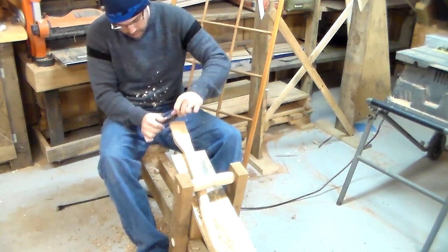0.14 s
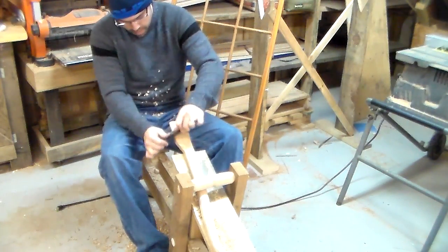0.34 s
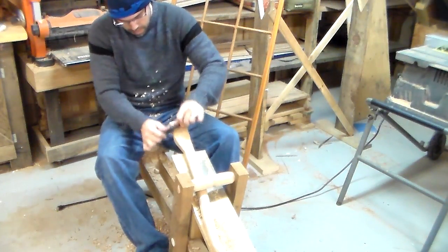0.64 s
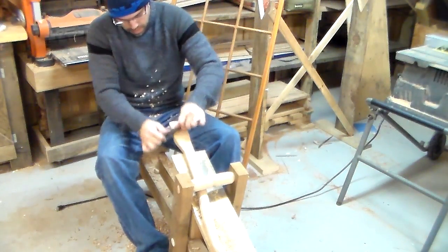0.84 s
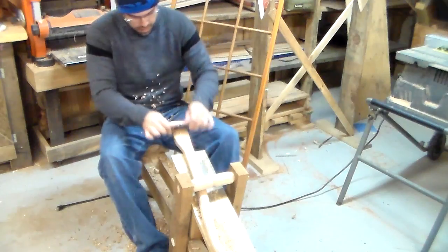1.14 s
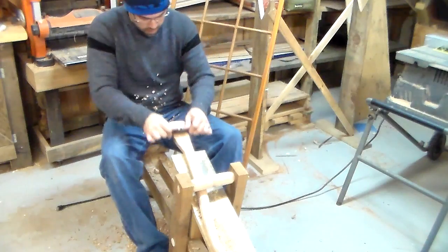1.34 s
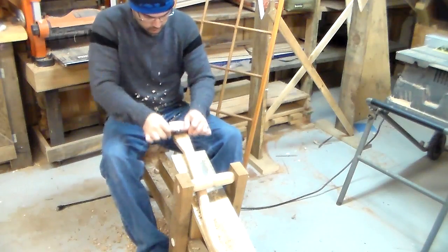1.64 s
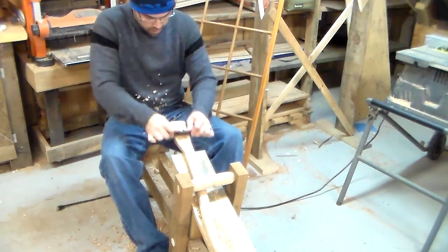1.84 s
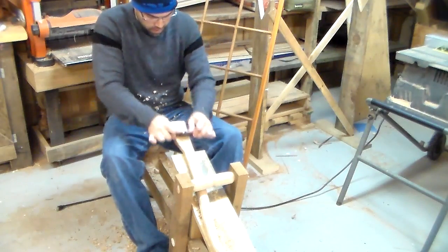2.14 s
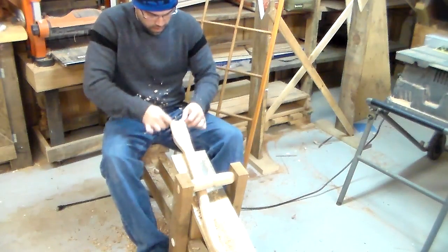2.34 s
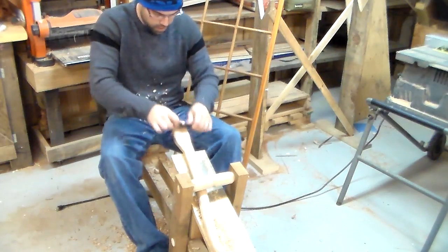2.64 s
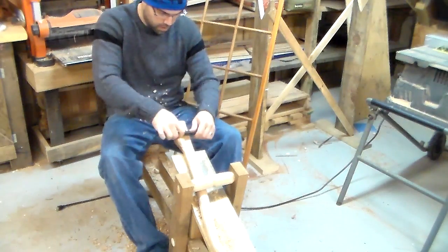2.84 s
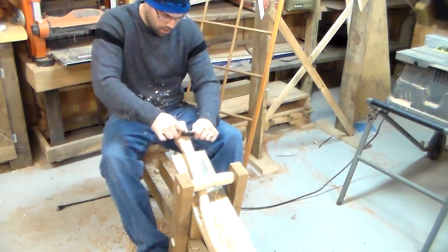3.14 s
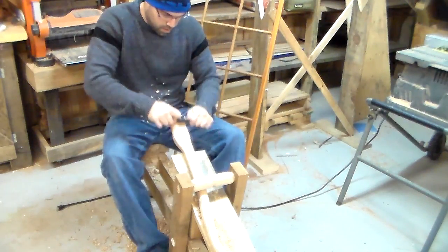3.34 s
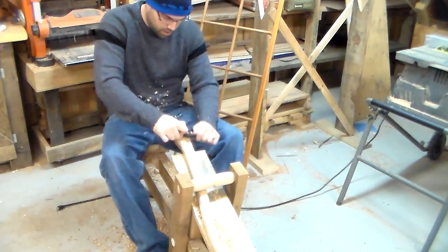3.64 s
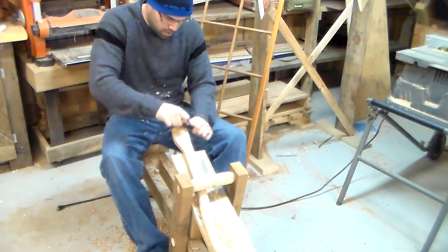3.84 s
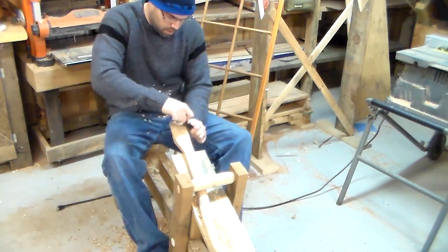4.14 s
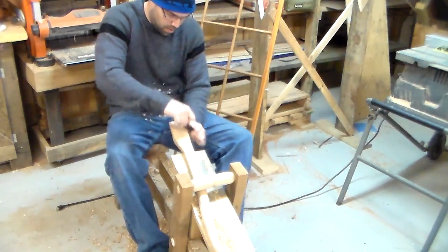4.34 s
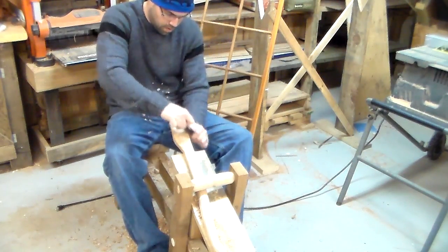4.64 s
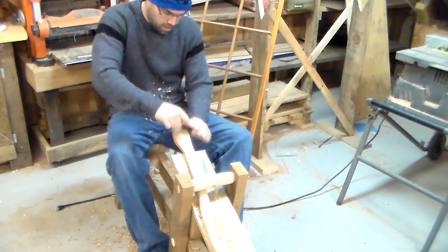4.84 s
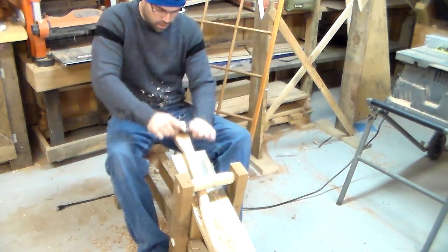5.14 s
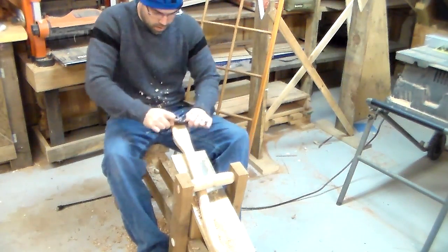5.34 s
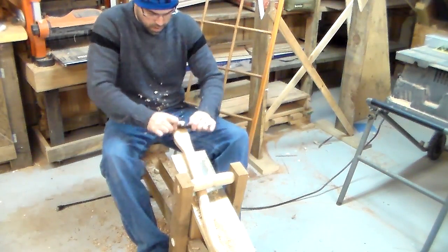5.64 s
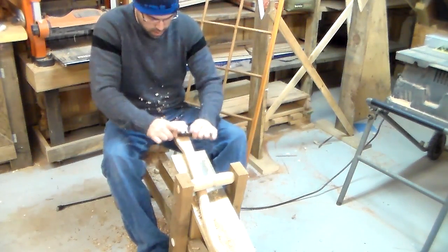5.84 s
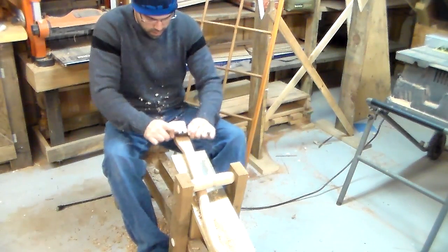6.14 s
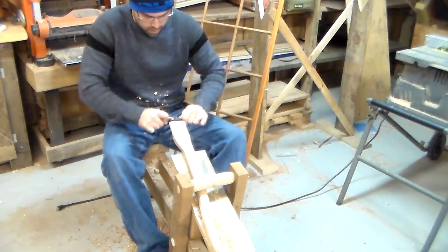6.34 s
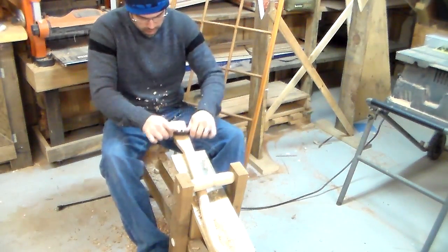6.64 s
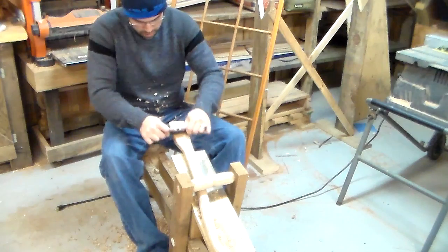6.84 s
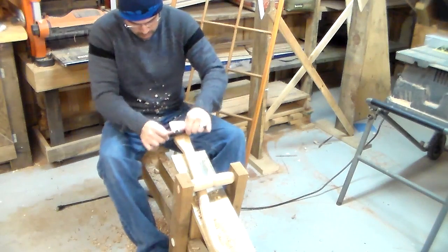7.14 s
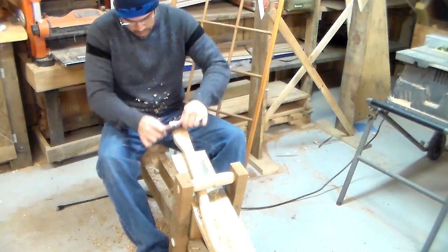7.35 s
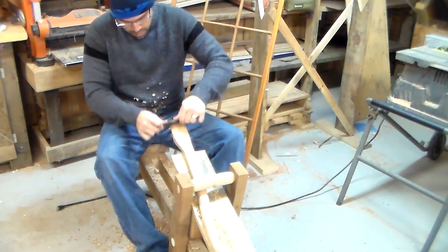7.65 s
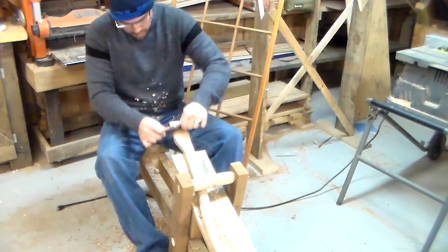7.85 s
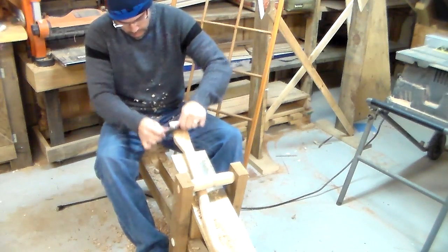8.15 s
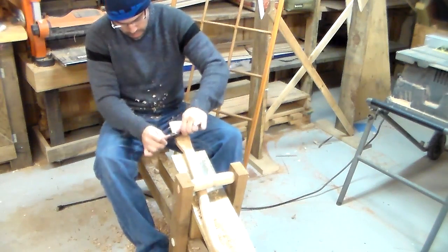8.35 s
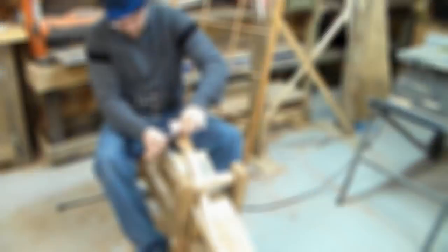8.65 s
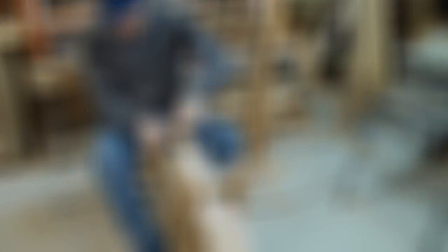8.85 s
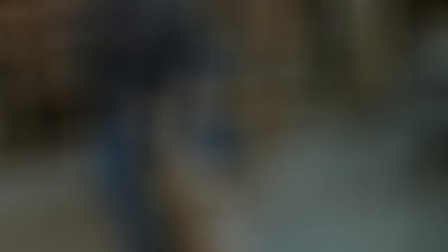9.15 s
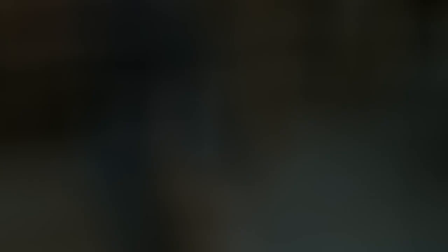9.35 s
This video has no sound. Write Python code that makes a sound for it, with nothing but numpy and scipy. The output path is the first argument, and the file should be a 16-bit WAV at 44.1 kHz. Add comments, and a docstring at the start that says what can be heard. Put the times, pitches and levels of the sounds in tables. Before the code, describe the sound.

Uneven scraping of a hand blade on wood, broken by sharp clacks and dull thuds, in a quiet small workshop.

```python
"""Spokeshave on end grain

A steel spokeshave pares the end of a wooden blank clamped in a shaving horse, in a timber workshop.
Tearing fibres, as random impulses, drive resonant modes of blank, horse and tool and sound as a rasp.
Among the strokes the tool lands (noisy impacts on the modes), skids, squeaks (stick-slip tones) and
slides back. Decaying noise adds a short room tail; a low hum, rumble and hiss lie beneath."""
import sys
import numpy as np
from scipy import signal
from scipy.fft import rfft, irfft, next_fast_len
from scipy.io import wavfile

SR = 44100
rng = np.random.default_rng(int(sys.argv[2]) if len(sys.argv) > 2 else 0)


def unload_audio(sound):
    """Save the sound as a 16-bit wav file, at the path given as the first command line argument."""
    columns = np.transpose(np.atleast_2d(sound))
    # keep every value between -1 and 1, then stretch to whole-number steps
    steps = np.round(np.clip(columns, -1, 1) * 32767)
    wavfile.write(sys.argv[1], SR, steps.astype(np.int16))


N = 419391


def from_db(db):
    """Logarithmic level: decibels to amplitude gain."""
    return 10 ** (np.asarray(db) / 20)


def rms_one(x):
    """Normalisation: a signal scaled to unit mean power."""
    return x / np.sqrt(np.mean(x ** 2) + 1e-20)


def at_hz(points, hz):
    """Interpolation of a frequency table on a logarithmic axis."""
    f, values = np.transpose(points)
    return np.interp(np.log(hz + 1), np.log(f), values)


def over_time(points):
    """Linear interpolation of a time table at every sample."""
    return np.interp(np.arange(N) / SR, *np.transpose(points))


def colour(x, spectrum):
    """Spectral shaping: each frequency is weighted by a smooth gain curve."""
    size = next_fast_len(x.shape[-1])
    gain = from_db(at_hz(spectrum, np.fft.rfftfreq(size, 1 / SR)))
    return irfft(rfft(x, size) * gain, size)[..., :x.shape[-1]]


def bandpass(x, band):
    """Band limitation by a Butterworth filter."""
    return signal.sosfilt(signal.butter(2, band, "band", fs=SR, output="sos"), x)


def drift(rate_hz):
    """Low-passed random fluctuation of unit spread, drawn at every 32nd sample."""
    r = np.exp(-64 * np.pi * rate_hz / SR)
    settle = 1400   # steps dropped while the filter settles
    noise = rng.standard_normal(N // 32 + settle + 2)
    slow = signal.lfilter([1], [1, -2 * r, r * r], noise)[settle:]
    return np.interp(np.arange(N) / 32, np.arange(len(slow)), rms_one(slow))


# rumble and hiss: f/Hz, level/dB per Hz (relative)
AIR_SPECTRUM = [(20, 3), (41, 7), (61, 14), (110, -4), (240, 0), (1000, -6.5), (4000, -15), (14500, -21)]


def air():
    """Stationary noise: independent coloured rumble and hiss for mid and side."""
    level_db, side_db = -59, -3.0
    mid, side = from_db(level_db) * rms_one(colour(rng.standard_normal((2, N)), AIR_SPECTRUM))
    return mid, from_db(side_db) * side


def hum():
    """Amplitude modulation: a pure low tone of slightly wandering level."""
    hz, level_db = 30.0, -59
    level = np.sqrt(2) * from_db(level_db + 1.2 * drift(3.4))
    return level * np.sin(2 * np.pi * hz * np.arange(N) / SR)


# reverberation time of the room: f/Hz, t60/s
ROOM_DECAY = [(100, 0.08), (700, 0.31), (2000, 0.33), (5000, 0.19), (12000, 0.15)]


def workshop(x):
    """Reverberation: convolution with noise tails that decay exponentially, band by band."""
    t = np.arange(int(0.5 * SR)) / SR
    edges = 60 * 2.0 ** np.arange(9)   # octaves
    tails = 0
    for low, high in zip(edges, edges[1:]):
        band = bandpass(rng.standard_normal((3, len(t))), [low, high])
        tails = tails + band * from_db(-60 * t / at_hz(ROOM_DECAY, np.sqrt(low * high)))
    tails = tails * (1 - np.exp(-t / 0.00011))   # first echoes need a moment to arrive
    tails = tails / np.sqrt(np.sum(tails ** 2, axis=1, keepdims=True))
    # two tails are shared by both channels and traded as the hands move; the third, drawn on its own, is the
    # difference between the channels
    place = 2 * drift(2.08)
    sources = [x * np.cos(place), x * np.sin(place), x]
    here, there, differing = signal.fftconvolve(sources, tails, axes=1)[:, :N]
    return here + there, differing


# the sole squeaks on the end grain: t/s, length/s, starting f/Hz, level/dB (relative)
SQUEAK_EVENTS = [(1.529, 0.066, 1700, -25.5), (1.62, 0.0464, 1600, -26), (2.166, 0.069, 1470, -30)]


def squeaks():
    """Stick-slip friction: a rough tone and its octave swell, sag in pitch and fade."""
    sag_share, width_hz, octave_db = 0.18, 200, -13.5   # share of pitch lost; roughness; octave over tone
    t = np.arange(N) / SR
    rough = [drift(width_hz) for _ in range(4)]
    out = 0
    for start, length, hz, db in SQUEAK_EVENTS:
        since = t - start
        swell = np.sin(np.pi * np.clip(since / length, 0, 1) ** 2) ** 2   # builds slowly, breaks off fast
        phase = 2 * np.pi * (hz * since - sag_share * hz / length * since ** 2 / 2)
        tone = rough[0] * np.sin(phase) + rough[1] * np.cos(phase)
        octave = rough[2] * np.sin(2 * phase) + rough[3] * np.cos(2 * phase)
        out = out + from_db(db) * swell * (tone + from_db(octave_db) * octave)
    return out


def resonate(force, hz, width):
    """Damped resonance: one mode of unit peak gain strays in pitch as grip and clamping change."""
    stray_share, stray_hz = 0.008, 2.5
    r = np.exp(-np.pi * width / SR)
    path = hz * (1 + stray_share * drift(stray_hz))
    turn = np.exp(2j * np.pi * np.cumsum(path) / SR)
    # shift the mode to zero frequency, low-pass it there and shift it back
    slow = signal.lfilter([1 - r], [1, -r], (force + 1e-18) * turn.conj())
    return 2 * np.real(turn * slow)


def body(force, modes, shift_db):
    """Modal superposition: the moving contact point drives each parallel mode unevenly."""
    out = 0
    for k, (hz, width, db) in enumerate(modes):
        uneven = force * from_db(shift_db * drift(12.1))
        out = out + (-1) ** k * from_db(db) * resonate(uneven, hz, width)
    return out


# the tool lands or taps, then skids: t/s, clack level/dB (relative), thud level/dB over the clack,
# steel ring level/dB over the clack, skid level/dB (relative)
KNOCK_EVENTS = [(0.305, -18.5, 4, -28, -33.5), (0.394, -25.5, 11, -35, -32), (1.312, -17, 4.5, -32, -33),
                (1.347, -21, 6, 11.5, -34), (2.441, -10.5, 0.5, -18, -53), (2.476, -6.5, -9.5, -44, -28),
                (2.839, -46.5, 14, -36, -60.5), (3.076, -29, -9, -23, -56), (3.148, -25.5, -15, -14, -72),
                (3.619, -10, -7.5, -20, -24.5), (3.786, -2, -8.5, -30, -30.5),
                (4.706, -11.5, -4.5, -34, -26.5), (5.249, -17, -32, -20, -56),
                (6.412, -32, 10.5, -43, -29.5), (6.528, -13.5, 2.5, -43, -25), (6.772, -12, 6, -31, -27),
                (7.856, -19, 1.5, -20, -32), (7.882, -10.5, -12, -24, -37), (7.955, -14, -24, -8.5, -26.5),
                (8.248, -14.5, 5, -17, -50), (9.139, -29.5, -25, 11.5, -45), (9.183, -41, 14.5, -30, -50),
                (9.282, -18.5, -34, -2, -52), (9.32, -37.5, 18.5, -27, -58)]


def blows(over_clack_db, modes, contact_s, rattle_s, first_db):
    """Impact excitation: a first contact and its decaying noisy rattle strike a set of modes."""
    start, clack_db, *_ = np.transpose(KNOCK_EVENTS)
    clicks = np.zeros(N)
    clicks[(start * SR).astype(int)] = from_db(clack_db + over_clack_db)
    envelope = signal.lfilter([1], [1, -np.exp(-1 / (rattle_s * SR))], clicks + 1e-18)
    strike = from_db(first_db) * clicks + envelope * rng.standard_normal(N)
    soft = np.exp(-1 / (contact_s * SR))   # a longer contact is duller
    force = signal.lfilter([(1 - soft) ** 2], [1, -2 * soft, soft ** 2], strike)
    return body(force, modes, shift_db=2.5)


# modes of blank and horse: f/Hz, width/Hz (before any damping by the tool), level/dB (relative)
WOOD_MODES = [(116, 22, -20), (219, 28, -8), (285, 45, -13), (392, 20, 2), (500, 55, -9), (626, 24, 4),
              (744, 36, -4), (850, 110, -9)]
# modes of the blank's clamped end and the tool's sole: f/Hz, width/Hz, level/dB (relative)
SOLE_MODES = [(1054, 40, 0), (1256, 40, 2), (1420, 280, 3.5), (1787, 50, 3), (2015, 36, 3), (2560, 140, 0),
              (2905, 50, 2), (3200, 80, -2), (3490, 110, 1), (4050, 400, -5.5)]
# modes of steel blade and cap: f/Hz, width/Hz, level/dB (relative)
BLADE_MODES = [(5120, 60, 0), (6110, 50, -3), (6470, 70, -9), (7240, 200, -7)]


def knocks():
    """Impact response: a thud in the wood, a clack in the sole, a ring in the steel and its loose cap."""
    _, _, thud_db, ring_db, _ = np.transpose(KNOCK_EVENTS)
    pressed_widens = 2.5   # the landing tool damps the wood's modes
    wood = [(hz, pressed_widens * width, db) for hz, width, db in WOOD_MODES[1:]] + [(1160, 930, -4.5)]
    steel = SOLE_MODES[-2:] + BLADE_MODES[1:] + [(5490, 140, 4), (10200, 140, 1), (11000, 13500, -18)]
    thud = blows(thud_db, wood, contact_s=0.00015, rattle_s=0.011, first_db=22.0)
    clack = blows(0, SOLE_MODES, contact_s=0.00004, rattle_s=0.0035, first_db=15.5)
    ring = blows(ring_db, steel, contact_s=0.000012, rattle_s=0.0097, first_db=14)
    return from_db(8) * thud + from_db(-0.5) * clack + from_db(-2.0) * ring


# the blade bites: full bite t/s, rise/s, hold/s, cut level/dB (relative), then level/dB over the cut for
# low wood, upper wood, upper sole, edge sizzle
STROKE_EVENTS = [(0.037, 0.39, 0.036, -25, -6.5, -3.5, -10.5, -51),
                 (0.522, 0.012, 0.052, -24, -15.5, -11, -3.5, -8),
                 (0.768, 0.017, 0.047, -22, -21.5, -10, -5, -15),
                 (1.051, 0.047, 0.0056, -24.5, -5, -6.5, -5, -36),
                 (1.55, 0.13, 0.0046, -33.5, -16.5, -30, -2, -12),
                 (1.686, 0.063, 0.013, -27, -18.5, -9, -6.5, -14),
                 (1.779, 0.021, 0.021, -37, -6.5, -22, 12.5, 4),
                 (1.858, 0.04, 0.0056, -25, -35, -10.5, -21, -28),
                 (1.974, 0.084, 0.017, -27.5, -21, -17, -6, -28),
                 (2.104, 0.008, 0.017, -31.5, -6.5, -7, 2, -12),
                 (2.186, 0.0088, 0.065, -35, -13.5, -5, 0.5, -6.5),
                 (2.348, 0.051, 0.063, -26.5, -9, -17, -3, -16), (3.074, 0.28, 0.16, -58.5, -9, -24, 1, 3),
                 (3.401, 0.049, 0.064, -33, -2.5, -4, 8.5, -12.5),
                 (3.949, 0.079, 0.025, -28.5, -7.5, -4.5, -1, -14.5),
                 (4.255, 0.057, 0.0039, -28.5, -8, -5, 4, -7),
                 (4.464, 0.0076, 0.053, -23.5, -17, -10.5, -0.5, -11),
                 (4.856, 0.025, 0.0058, -33, -19.5, -16, 1.5, -10),
                 (5.171, 0.15, 0.005, -50, -5, -17, 13, 2), (5.29, 0.053, 0.034, -35.5, -11, -9, -1, -14),
                 (5.396, 0.015, 0.091, -35.5, -3.5, -0.5, 3.5, -15),
                 (5.597, 0.11, 0.005, -31, -12, -13.5, -4, -20.5),
                 (5.688, 0.014, 0.098, -26.5, -4.5, -1.5, 1, -20),
                 (6.033, 0.015, 0.052, -27.5, -10.5, -0.5, 3.5, -5),
                 (6.381, 0.046, 0.019, -30.5, -17.5, -21, 5.5, -22),
                 (6.975, 0.032, 0.075, -23.5, -20, -5.5, -6.5, -21),
                 (7.21, 0.11, 0.061, -38.5, -9.5, -12, -9.5, -30),
                 (7.327, 0.0086, 0.005, -34.5, -8.5, -25, 10, -3),
                 (7.376, 0.039, 0.029, -22.5, -15.5, -7.5, -5.5, -18.5),
                 (7.525, 0.056, 0.054, -24, -12, -10.5, -12, -27),
                 (7.632, 0.013, 0.015, -22.5, -7.5, -6.5, 0, -9.5),
                 (7.906, 0.22, 0.0061, -31, -20, -28, -16, -27),
                 (7.968, 0.022, 0.021, -25.5, -28, -3.5, 1.5, -21),
                 (8.161, 0.058, 0.0072, -21.5, -10.5, -8, -9.5, -38),
                 (8.259, 0.021, 0.0046, -21.5, -10.5, -31, -2, -18),
                 (8.478, 0.14, 0.005, -29, -15.5, -10, -10, -28),
                 (8.569, 0.056, 0.005, -25.5, -14, -9.5, -1.5, -11),
                 (8.765, 0.093, 0.0046, -32, -9.5, -4, -7, -17),
                 (8.84, 0.021, 0.018, -34, -11, -6.5, 1, -7),
                 (9.076, 0.2, 0.005, -37.5, -9, -1.5, -8.5, -15.5),
                 (9.132, 0.026, 0.17, -42.5, -1.5, -2, 0, -10)]
# the sole slides back lightly: t/s, hold/s, level/dB (relative), then level/dB over it for
# low wood, upper wood, edge sizzle
SLIDE_EVENTS = [(0.666, 0.036, -37.5, -11.5, -31, -9), (0.917, 0.024, -34.5, -14.5, -26, -9),
                (2.061, 0.019, -35, -17, -14, -10), (4.084, 0.065, -45, -0.5, 0, -9),
                (4.335, 0.08, -41, -9, -2, -6.5), (4.985, 0.058, -44, -10.5, -1, -13),
                (5.945, 0.023, -43, -8, -8, -14.5), (9.298, 0.11, -65, 22, 24.5, -24)]
# fall as the blade leaves low wood, upper wood, lower sole, upper sole, blade: one rate/(dB per s) each
RELEASE = [164, 207, 170, 234, 205]


def contact():
    """Envelopes: every stroke, slide and skid rises, holds and decays in each group of modes."""
    rows = [(start, rise, hold, db, low, upper, 0, sole, edge)
            for start, rise, hold, db, low, upper, sole, edge in STROKE_EVENTS]
    slide_rise_s, slide_sole_db = 0.064, -1
    rows += [(start, slide_rise_s, hold, db, low, upper, 0, slide_sole_db, edge)
             for start, hold, db, low, upper, edge in SLIDE_EVENTS]
    # a skid follows its knock by 3 ms; a brighter ring leaves a brighter skid (0.67 dB per dB)
    rows += [(start + 0.003, 0, 0, db, -9.5, -2, 0, -11, 2.5 + 0.67 * ring)
             for start, _, _, ring, db in KNOCK_EVENTS]
    start, rise, hold, db, *over_db = np.transpose(rows)[:, :, None]
    t = np.arange(0, N + 44, 44) / SR
    early = np.maximum(start - t, 0)
    late = np.maximum(t - start - np.maximum(hold, 0), 0)
    rise_db = 20   # gained over the rise
    rising_db = db - rise_db * early / np.maximum(rise, 0.002)
    gains = []
    for over, fall in zip(over_db, RELEASE):
        power = np.sum(from_db(rising_db + over - fall * late) ** 2, axis=0)
        gains.append(np.interp(np.arange(N) / SR, t, np.sqrt(power)))
    return gains


def fibres(per_s, uneven_db, judder_db):
    """Random impulse process: fibres part with uneven force, in clumps as the blade judders."""
    sizes = from_db(uneven_db * np.minimum(rng.exponential(1, N), 5)) * rng.choice([-1, 1], N)
    parted = rng.random(N) < per_s / SR
    return rms_one(sizes * parted * from_db(judder_db * drift(53.4)))


# tilt of the rasp within each band: f/Hz, gain/dB (relative; each band's level is set separately)
RASP_TILT = [(200, 15), (500, 26.5), (1500, 23), (3900, -20), (5000, -76), (8500, -15), (13000, -18.5),
             (15000, -4.5)]
# balance for horse, low wood, upper wood, lower sole, upper sole, blade:
# ring level/dB, mean rasp level/dB (both relative)
GROUP_LEVELS = [(-7, -10), (-1.5, -19), (1.5, -11.5), (-12, -14), (-6.5, -6.5), (-1, -6.5)]
# the horse's deep modes: t/s, level/dB over the low wood
HORSE_LEVEL = [(0, 2), (1.2, -4), (1.698, 6.5), (3.6, -3), (4.4, 1.5), (5.2, 8.5), (5.7, -9), (6.4, 10),
               (7.2, -5.5), (9.1, -2), (9.2, 8.5)]
# how freely the blade rings in the grip: t/s, level/dB over the rasp (relative)
GRIP_FREEDOM = [(1.299, -22.5), (1.6, -10.5), (2.5, -4), (2.8, -12.5), (5.0, -6), (5.698, 2.5), (6.1, -12)]
# how freely the upper wood rings: t/s, level/dB over the rasp (relative)
WOOD_FREEDOM = [(0.2, -5.5), (0.5, 0), (1.3, -8.5), (3.4, 1.5), (3.6, -6.5), (6.85, -5.5), (7.0, -3),
                (8.3, -0.5), (9.1, -8)]


def shaving():
    """Forced vibration: tearing fibres ring each group of modes and radiate a patchy rasp around them."""
    groups = ((WOOD_MODES[:3], (90, 310)), (WOOD_MODES[3:4], (310, 480)), (WOOD_MODES[4:], (480, 980)),
              (SOLE_MODES[:5], (980, 2300)), (SOLE_MODES[5:], (2300, 4600)),
              (BLADE_MODES, (4400, 16000)))   # modes, rasp band in Hz
    gains = contact()
    horse = gains[0] * from_db(over_time(HORSE_LEVEL))
    freedom = [1, 1, from_db(over_time(WOOD_FREEDOM)), 1, 1, from_db(over_time(GRIP_FREEDOM))]
    # thick fibres crack and shake every part at once
    snaps = fibres(per_s=250.0, uneven_db=3.0, judder_db=0.5)
    out = 0
    for (modes, band), gain, free, (ring_db, rasp_db) in zip(groups, [horse] + gains, freedom, GROUP_LEVELS):
        # the other fibres part independently for each group
        snap_share = 0.3 if modes is BLADE_MODES else 0.65
        force = fibres(per_s=3000.0, uneven_db=-0.5, judder_db=2.0) + snap_share * snaps
        # estimated ring level for this force, divided out
        mode_power = sum(from_db(2 * db) * np.pi * width / SR for _, width, db in modes)
        size = np.std(force) * np.sqrt(mode_power)
        out = out + from_db(ring_db) * body(force * gain * free, modes, shift_db=3.5) / size
        rasp = rms_one(bandpass(colour(force, RASP_TILT), band))
        out = out + from_db(rasp_db + 4.2 * drift(6.6)) * gain * rasp
    return out


# stereo spread of the room's differing tail: f/Hz, side gain/dB
SIDE_SPECTRUM = [(60, -10), (300, -37), (700, -23.5), (2000, -21.5), (5000, -10), (9000, -1.5), (14000, -9)]


def scene():
    """Mid-side superposition: work, room and background are turned into left and right."""
    lowest_hz, room_db = 110, -7
    # the work is high-passed to keep out lows leaking through the resonators
    highpass = signal.butter(2, lowest_hz, "high", fs=SR, output="sos")
    work = signal.sosfilt(highpass, shaving() + knocks() + squeaks())
    shared, differing = workshop(work)
    air_mid, air_side = air()
    mid = work + from_db(room_db) * shared + air_mid + hum()
    side = colour(differing, SIDE_SPECTRUM) + air_side
    return np.array([mid + side, mid - side])


def record(dry):
    """Saturation and band limitation: loud peaks are rounded off, then the top is cut steeply."""
    top, cutoff_hz = 0.34, 14420   # amplitude limit; start of the 60 dB stop band
    rounded = top * np.tanh(dry / top)
    return signal.sosfilt(signal.cheby2(16, 60, cutoff_hz, fs=SR, output="sos"), rounded)


dry = scene()
out = record(dry)
unload_audio(out)
```